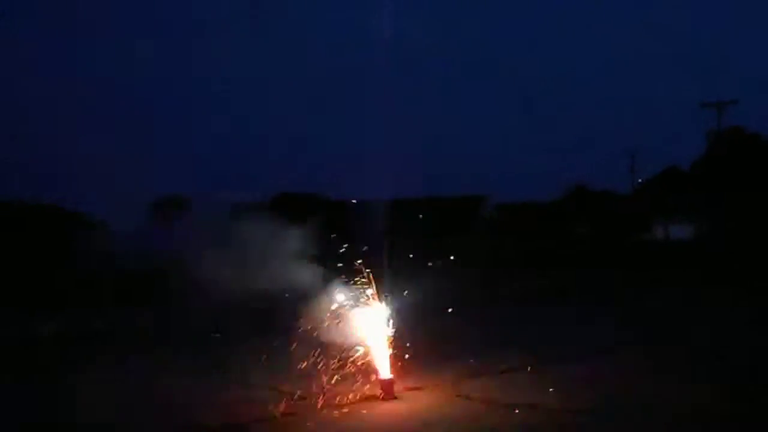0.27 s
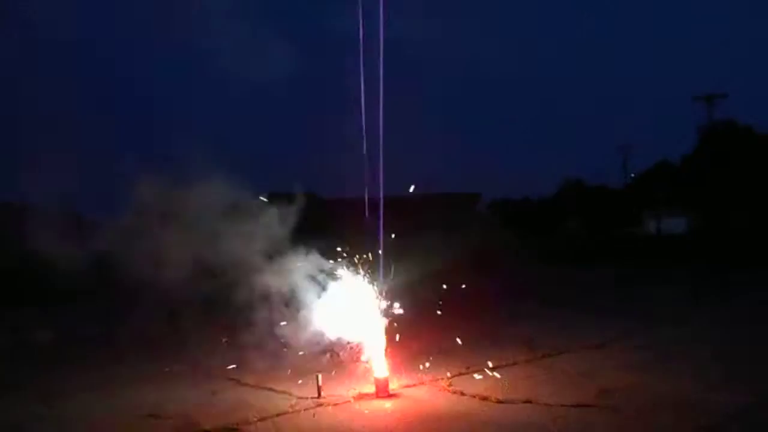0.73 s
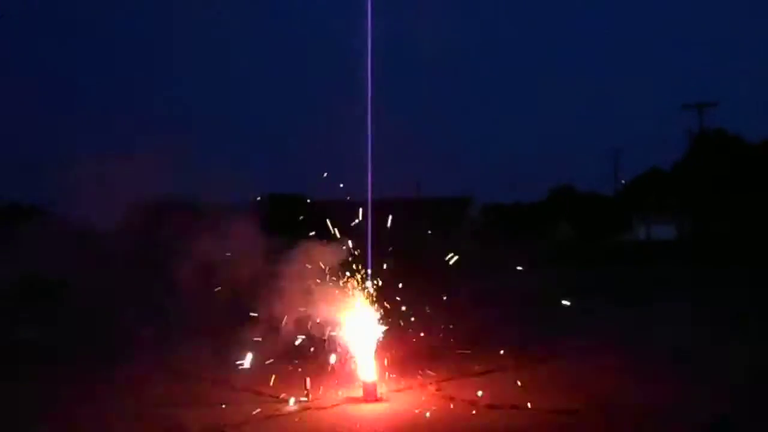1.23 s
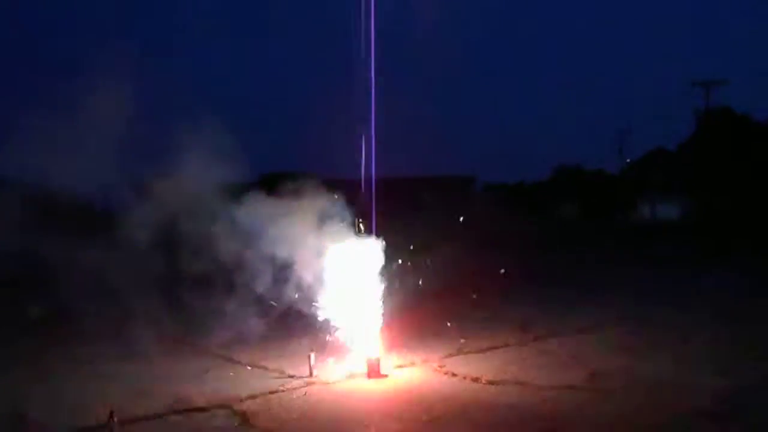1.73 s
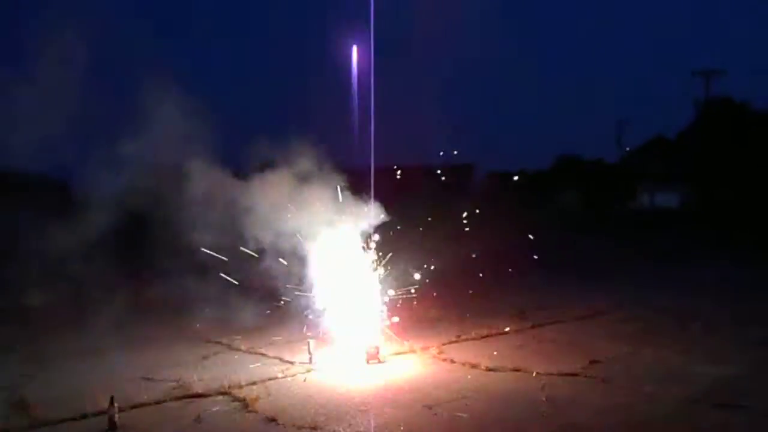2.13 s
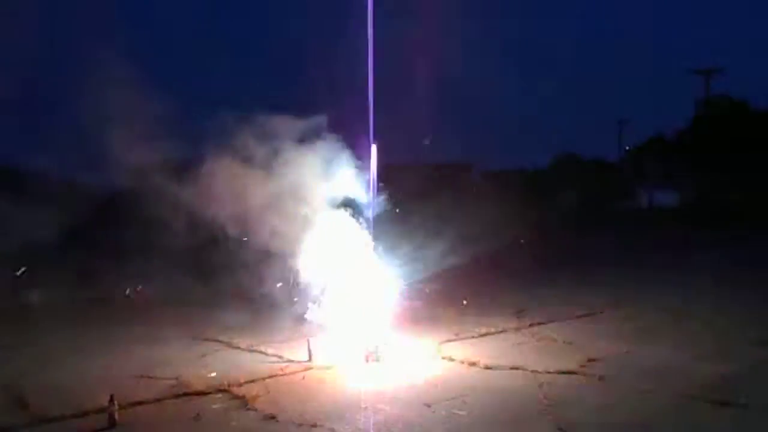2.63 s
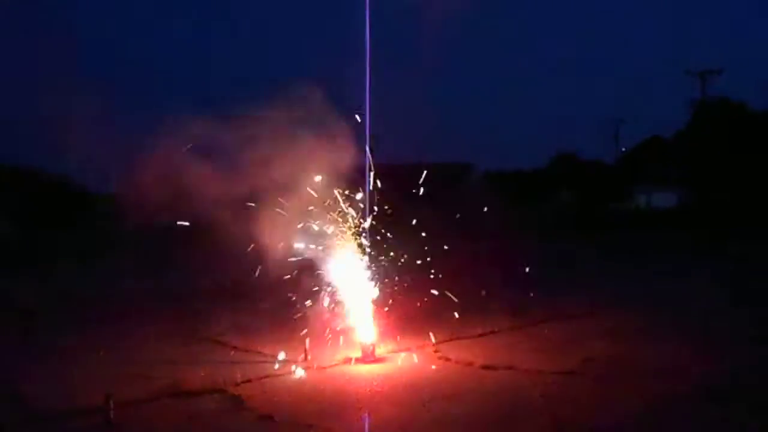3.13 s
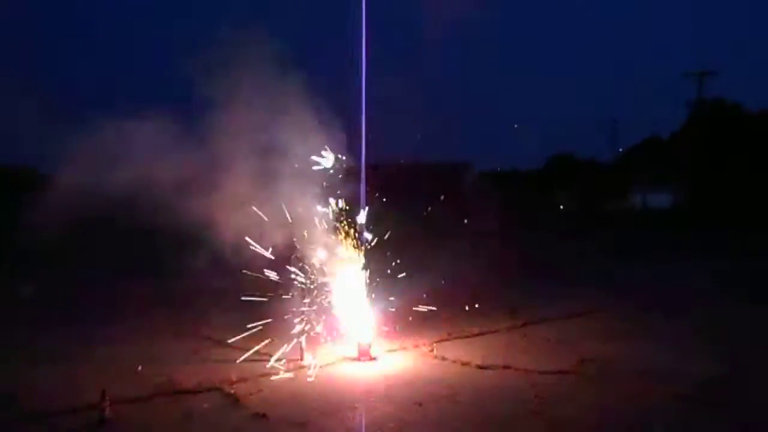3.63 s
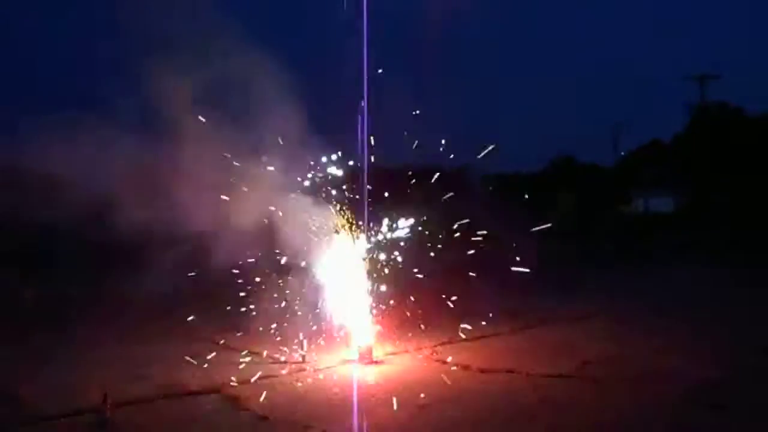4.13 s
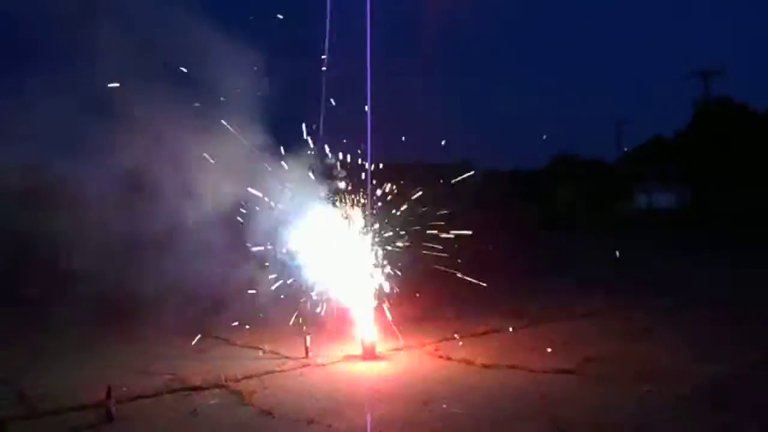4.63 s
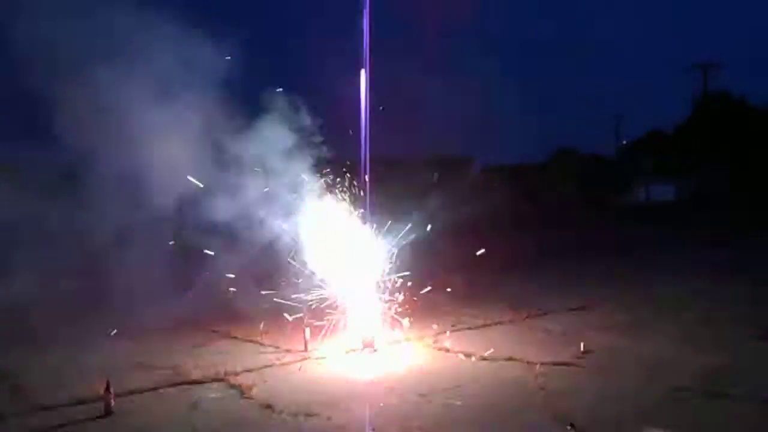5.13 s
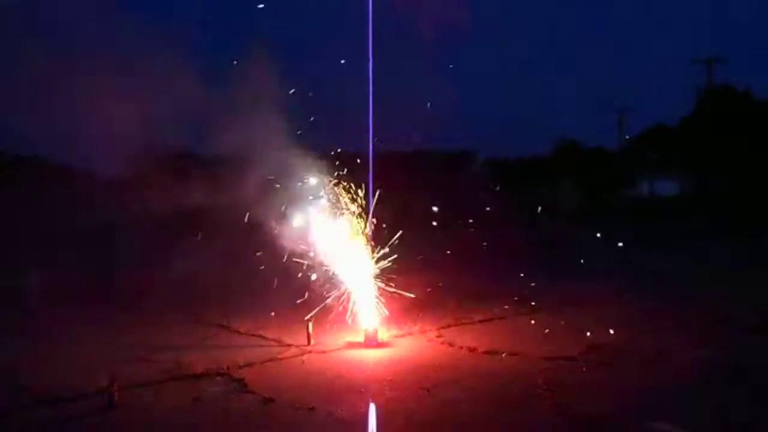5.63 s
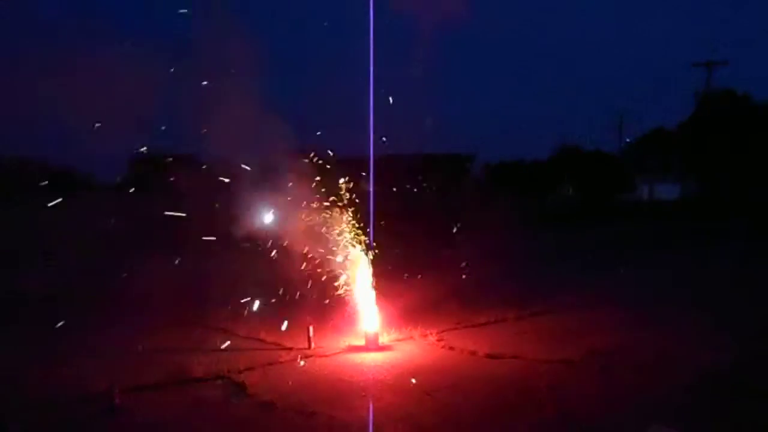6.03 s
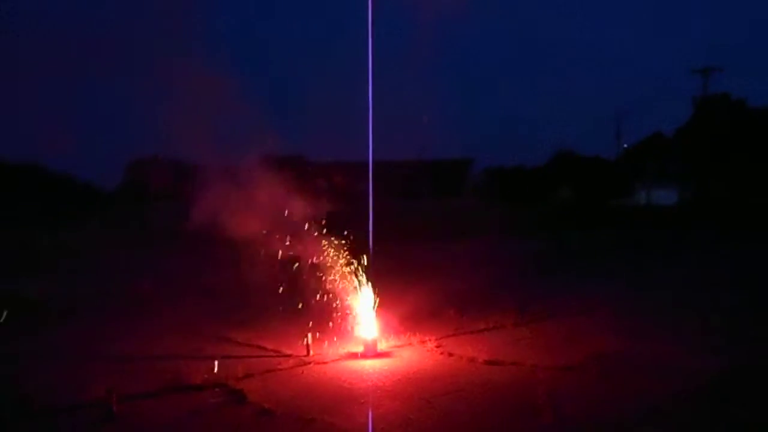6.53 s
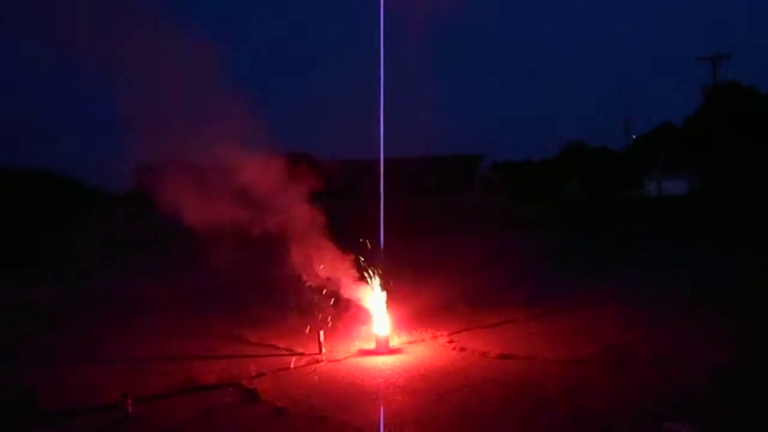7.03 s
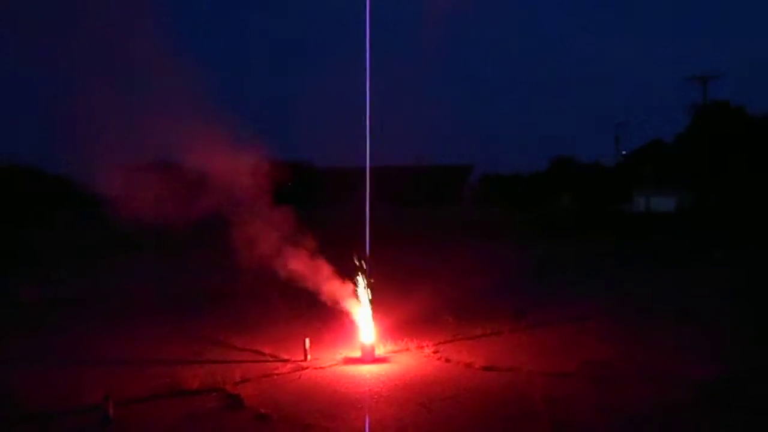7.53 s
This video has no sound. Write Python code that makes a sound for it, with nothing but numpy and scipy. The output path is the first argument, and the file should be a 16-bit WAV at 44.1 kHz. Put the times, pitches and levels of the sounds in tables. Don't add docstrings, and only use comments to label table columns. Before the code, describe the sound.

A firework fountain burns in an open paved area, heard fairly close on a small camera microphone. Dry pops and heavy cracks arrive in uneven clusters over faint hissing, fizzing sparks and gusty rumble, with a very distant engine hum early on. The hiss rises in pauses between bursts. Late on, the bursts end, the tube gives several hollow pops, and bright rushing gas takes over until the cut.

```python
import sys
import numpy as np
from scipy import signal
from scipy.fft import rfft, irfft, next_fast_len
from scipy.io import wavfile
from scipy.ndimage import uniform_filter1d, map_coordinates

SR = 44100
rng = np.random.default_rng(int(sys.argv[2]) if len(sys.argv) > 2 else 0)


def transcribe(u):
    v = np.clip(np.atleast_2d(u).T, -1, 1)
    q = np.round(v * 32767).astype(np.int16)
    wavfile.write(sys.argv[1], SR, q)


def gain_from_db(level_db):
    decades = np.asarray(level_db, float) / 20
    return 10 ** decades


N = 342657

# (time [s], level [dB])
ENGINE_HUM = [
    (0.0, -56),
    (1.2, -37),
    (1.6, -44),
    (2.4, -46),
    (3.3, -62),
    (4.0, -54),
    (7.77, -64),
]
# (time [s], level [dB])
GUSTS = [(0.0, -29.5), (0.45, -28), (0.7, -28.5), (0.95, -30.5), (1.2, -31.5), (1.5, -31), (1.8, -39.5),
         (2.5, -32.5), (2.9, -35), (3.6, -28), (4.2, -34.5), (4.5, -33), (4.8, -42), (5.1, -34),
         (5.7, -41.5), (6.6, -41.5), (7.05, -40), (7.77, -38)]
# (frequency [Hz], level [dB per Hz])
WIND_COLOUR = [(10, -30), (25, 3), (50, 0.5), (92, -1.5), (200, -16), (450, -20), (1000, -94),
               (22000, -120)]
ROAR_COLOUR = [(60, -20), (140, 5), (240, -3), (400, 1), (700, -0.5), (1300, -8.5), (2200, -47),
               (22000, -80)]
JET_COLOUR = [(600, -21), (1500, 3.5), (3000, 0.5), (6300, -9), (9400, -19.5), (12000, -28), (22000, -2)]
SPARK_COLOUR = [(700, -36), (1500, 4), (2500, 10), (5000, -2), (8000, -6.5), (12000, -19), (22000, -31)]
# (time [s], nozzle effort [dB], spark shower [dB])
BURN = [(0.0, 0.4, -56.5), (1.5, -1.5, -54.5), (3.0, -0.5, -51), (4.5, 1.1, -49), (5.6, 1.3, -48),
        (6.2, 1, -47.5), (6.5, 3, -57), (6.75, 14, -52), (6.95, 14, -46.5), (7.3, 18.5, -49.5),
        (7.77, 19, -41.5)]
# (time [s], peak [dB], mouth resonance [Hz], width [Hz])
COUGHS = [
    (6.4596, -15, 1260, 305),
    (6.5683, -22, 520, 299),
    (6.7811, -16, 900, 298),
    (6.889, -18.5, 810, 400),
    (6.9377, -17, 1260, 450),
    (7.069, -33, 445, 300),
]
# (delay [ms], spread [ms], level [dB], strongest frequency [Hz], width [Hz], flatness)
ECHOES = [
    (3.056, 0.15, -13.5, 1000, 2700, 0.4),
    (4.05, 0.85, -19, 440, 3800, 0.065),
    (8.2, 0.45, -43.5, 7500, 24000, .2),
    (14.9, 0.86, -25.5, 550, 3300, 0.23),
    (21.63, 0.18, -33.5, 1500, 7000, 4.7),
    (34.6, 0.099, -29, 1430, 980, 2.6),
]
# (time [s], peak [dB], ground bounce delay [ms], blast length [ms])
LOW_STARS = [(0.1291, 1, 0.31, 0.054), (0.1444, 4.5, 0.28, 0.18), (0.2059, 6, 0.33, 0.026),
             (0.2413, 1.2, 0.44, 0.081), (0.4115, -7, 0.31, 0.1), (0.4425, -8.5, 0.31, 0.14),
             (0.8271, -0.5, 0.31, 0.08), (1.161, 16, 0.53, 0.061), (1.3321, -4.5, 0.31, 0.16),
             (1.3614, 12, 0.44, 0.062), (1.7555, 17.5, 0.62, 0.049), (2.1917, -6.5, 0.32, 0.16),
             (2.2364, -1.5, 0.38, 0.1), (2.854, 20.5, 0.38, 0.048), (2.906, 4.5, 0.43, 0.044),
             (2.9726, -5.5, 0.32, 0.094), (3.0451, 2.5, 0.66, 0.062), (3.4163, -8, 0.66, 0.12),
             (4.194, -4.5, 0.47, 0.11), (5.2375, 10, 0.61, 0.062), (5.30876, -5, 0.47, 0.095),
             (5.8701, -11, 0.41, 0.2)]
# (time [s], peak [dB], ground bounce delay [ms], blast length [ms])
HIGH_STARS = [(0.8085, 11.5, 0.79, 0.074), (2.34621, 5.5, 0.75, 0.095), (2.3962, -0.7, 0.88, 0.2),
              (2.416, -1, 0.86, 0.16), (2.6032, -10, 1.01, 0.2), (3.28682, 0, 0.99, 0.086),
              (3.4436, -6, 0.85, 0.082), (3.446, -4, 1.19, 0.13), (3.8027, 9, 0.87, 0.09),
              (3.9356, 6, 0.81, 0.067), (3.97893, 3.5, 1.01, 0.08), (4.0688, 5.5, 1.02, 0.077),
              (4.2046, -2, 1.18, 0.087), (4.2447, -6, 0.89, 0.14), (4.5106, 5.5, 0.95, 0.058),
              (4.6694, -4.5, 1.15, 0.12), (4.7167, -3, 0.93, 0.12), (4.7765, -6.5, 1.57, 0.12),
              (4.945, -8, 0.77, 0.08), (5.32522, -2.5, 0.79, 0.11), (5.3513, 0.3, 1.19, 0.094),
              (5.4894, -1, 0.95, 0.092), (5.4926, 6.5, 1.25, 0.058), (5.831, -9, 0.83, 0.11),
              (5.8809, -5.5, 1.2, 0.14), (5.9653, -2.5, 1.64, 0.083)]
# (time [s], peak [dB], ground bounce delay [ms], blast length [ms], bounce [dB])
STRAY_STARS = [(1.26, 15, 0.46, 0.071, -14), (2.0659, 22, 0.61, 0.08, -21), (2.1388, 11, 0.83, 0.12, 0.5),
               (2.8569, 6.5, 0.73, 0.12, -0.5), (2.869, -7, 0.56, 0.12, 1), (2.8921, 11, 0.73, 0.12, -6),
               (3.17656, -11, 0.33, 0.088, -10), (3.2175, 1, 1.06, 0.087, -8.5),
               (3.2409, -9, 0.43, 0.046, -8), (4.2341, -5, 1.23, 0.14, -7),
               (4.6121, 10.5, 0.37, 0.08, -16.5), (4.6141, 0.5, 0.22, 0.18, -5),
               (4.95847, -4, 1.22, 0.11, -3), (5.6684, 6.5, 0.4, 0.078, -18),
               (5.8722, -2.5, 0.35, 0.097, -24), (6.0867, -3, 1, 0.071, -5),
               (6.33058, -3.5, 2.44, 0.75, -4.5)]
# (time [s], peak [dB], ground bounce delay [ms], blast length [ms], extra slow body [dB])
SMALL_STARS = [(0.596, -30, 0.34, 0.35, -8), (0.634, -25.5, 0.3, 0.15, 21.5),
               (0.69302, -22, 0.29, 0.097, 27.5), (0.76295, -21, 0.47, 0.086, -6),
               (1.0424, -24, 0.29, 0.2, 4), (1.2446, -16.5, 0.2, 0.23, 2), (1.8399, -16, 0.25, 0.17, 9),
               (2.4803, -24.5, 0.27, 0.18, 4), (2.5003, -26.5, 0.16, 0.2, 0),
               (2.9378, -15, 0.17, 0.21, -14), (3.0212, -20, 0.32, 0.13, 11), (3.1293, -30, 0.25, 0.13, 12),
               (3.735, -33, 0.23, 0.09, -7), (3.887, -22, 0.16, 0.18, -7), (3.89, -22.5, 0.23, 0.19, -8),
               (4.1522, -26.5, 0.8, 0.2, 13), (4.8902, -18, 0.33, 0.13, 11.5),
               (5.0435, -32.5, 0.23, 0.21, 8), (5.4367, -26, 0.67, 0.33, 3), (6.05, -28.5, 0.24, 0.23, -4)]
# (time [s], peak [dB], ground bounce delay [ms])
FAR_STARS = [(0.229, -16.5, 0.83), (0.32556, -26.5, 0.74), (0.56, -31, 0.76), (0.8934, -17, 1.24),
             (0.9316, -28, 1.13), (1.4447, -20.5, 0.26), (1.4843, -29, 1.3), (2.2235, -18, 0.72),
             (2.32, -25, 1.2), (2.6888, -42, 1.1), (3.37129, -26, 0.77), (3.531, -28, 0.83),
             (3.5688, -36, 0.31), (4.0194, -23, 0.73), (4.2896, -29, 0.89), (4.3184, -29, 0.81),
             (4.6983, -17, 0.5), (4.86192, -36, 0.58), (5.5763, -23.5, 0.98), (5.5798, -25, 0.75),
             (5.748, -22.5, 0.42), (5.95495, -23, 0.78), (6.1708, -35, 1.43)]
# (time it lets go [s], gain then [dB], time a loud burst stops it [s], gain then [dB])
RELEASES = [(0.0, -4, 0.12, 4), (0.33, -6, 0.41, -4), (0.58, -5.5, 0.71, 3), (0.97, -2, 1.16, 6.5),
            (1.52, -6, 1.68, 5), (1.92, 5.5, 2.09, 6), (2.56, -7.5, 2.84, 3.5), (3.56, -16.5, 3.83, 3.5),
            (4.38, -14, 4.51, 1), (5.1, -12, 5.25, 5), (5.5, -8.5, 5.6, -5), (6.23, -16, 6.34, 3)]
# (frequency [Hz], level [dB])
MIC_RESPONSE = [(20, 0), (3000, 0), (8000, 5), (10000, 9), (10900, -3), (12100, -8), (12900, -62),
                (22000, -87)]

SPAN, LEAD = 4096, 64
NOZZLE_BOUNCE_S = .00031


def unit(x):
    return x / np.sqrt(np.mean(x ** 2) + 1e-20)


def curves(rows):
    s, *columns = np.transpose(rows)
    return [np.interp(np.arange(N) / SR, s, column) for column in columns]


def along(points, hz):
    f, v = np.transpose(points)
    return np.interp(np.log(hz + 1), np.log(f + 1), v)


def wobble(rate):
    knots = rng.standard_normal(int(N * rate / SR) + 4)
    return map_coordinates(knots, [np.arange(N) * rate / SR])


def filtered(x, response):
    m = next_fast_len(N + SPAN)
    return irfft(rfft(x, m) * response(np.fft.rfftfreq(m, 1 / SR)), m)[..., :N]


def rush(colour, patchy_db):
    z = signal.stft(rng.standard_normal(N + 512), nperseg=512)[2]
    patches = uniform_filter1d(rng.standard_normal(z.shape), size=6, axis=0)
    patches = uniform_filter1d(patches, size=10, axis=1)
    noise = signal.istft(z * gain_from_db(patchy_db * unit(patches)), nperseg=512)[1][:N]
    return unit(filtered(noise, lambda hz: gain_from_db(along(colour, hz))))


def resonance(hz, ring_hz, width_hz):
    return ring_hz ** 2 / (ring_hz ** 2 - hz ** 2 + 1j * hz * width_hz)


def blast(jw, tau):
    return SR * tau * jw * tau / (1 + jw * tau) ** 2


def engine():
    tone = filtered(rng.standard_normal(N), lambda hz: resonance(hz, ring_hz=92, width_hz=8) ** 2)
    return gain_from_db(curves(ENGINE_HUM)[0]) * unit(tone)


def wind():
    wind_db, = curves(GUSTS)
    gusty = gain_from_db(2.6 * wobble(6)) * rush(WIND_COLOUR, patchy_db=0.46)
    return gain_from_db(wind_db - 3.0) * unit(gusty)


def flame_roar(effort_db, flicker):
    roar_db = -46.5 + 0.56 * effort_db
    unsteady_db = .5 * flicker + .7 * wobble(40)
    return gain_from_db(roar_db - .3 + unsteady_db) * rush(ROAR_COLOUR, patchy_db=.7)


def nozzle_jet():
    grains = rng.exponential(size=N // 16 + 1).repeat(16)[:N]
    spit = 1 + .12 * grains ** 1.5
    jet = unit(spit * rush(JET_COLOUR, patchy_db=1.5))
    return filtered(jet, lambda hz: (1 + 0.68 * np.exp(-2j * np.pi * hz * NOZZLE_BOUNCE_S)) / 1.535)


def spark_shower(sparks_db):
    return gain_from_db(sparks_db + 1.6 * wobble(40)) * rush(SPARK_COLOUR, patchy_db=2.5)


def fountain():
    effort_db, shower_db = curves(BURN)
    hiss_db = -50 + effort_db
    sparks_db = shower_db - hiss_db + 1.5 * wobble(5)
    flicker = wobble(4.9)
    hiss = gain_from_db(hiss_db + 1.32 + 0.09 * flicker) * (nozzle_jet() + spark_shower(sparks_db))
    return hiss + flame_roar(effort_db, flicker)


def ticks():
    per_s, level_db, spread_db, end_s = 57, -48, 4.5, 4.7
    chance, size = rng.random(N), rng.exponential(size=N)
    happens = (chance < per_s / SR) * (np.arange(N) < end_s * SR)
    snaps = happens * gain_from_db(level_db + spread_db * size)

    def snap_and_bounce(hz):
        jw = 2j * np.pi * hz
        return blast(jw, 0.00006) * (1 + np.exp(-jw * NOZZLE_BOUNCE_S))

    return -filtered(snaps, snap_and_bounce)


def gain_control():
    return curves(np.reshape(RELEASES, (-1, 2)))[0]


def coughs():
    out, hz = np.zeros(N + SPAN), np.fft.rfftfreq(SPAN, 1 / SR)
    tube = 1.7 * resonance(hz, ring_hz=400, width_hz=160)
    for s, db, mouth_hz, width_hz in COUGHS:
        ringing = resonance(hz, mouth_hz, width_hz) + tube + 0.06
        puff = irfft(blast(2j * np.pi * hz, 0.00019) * ringing, SPAN)
        out[round(s * SR):][:SPAN] -= gain_from_db(db) * puff / np.abs(puff).max()
    return out[:N]


def stars():
    low = [(*row, 2, 0) for row in LOW_STARS]
    high = [(*row, 2, 0) for row in HIGH_STARS]
    stray = [(*row, 0) for row in STRAY_STARS]
    small = [(*row[:4], 1, row[4]) for row in SMALL_STARS]
    far = [(*row, 0.22, -13, 0) for row in FAR_STARS]
    return low + high + stray + small + far


def surroundings(scatter_db, t60, far_db, far_t60, top_hz):
    t, hz = np.arange(SPAN) / SR, np.fft.rfftfreq(SPAN, 1 / SR)
    grit = rng.standard_normal((len(stars()), SPAN))
    litter, trees = gain_from_db(scatter_db - 60 * t / t60), gain_from_db(far_db - 60 * t / far_t60)
    tail = (litter + trees) * (t > .0002)
    total = rfft(tail * grit) / (1 + 1j * hz / top_hz)
    for ms, spread, db, echo_hz, width_hz, flat in ECHOES:
        shift, size = rng.standard_normal((2, len(grit), 1))
        cluster = np.exp(-.5 * ((t * 1000 - ms - 0.2 * shift) / spread) ** 2)
        cluster = cluster / np.linalg.norm(cluster, axis=1, keepdims=True)
        face = (flat + grit) * cluster / np.hypot(flat, 1)
        colour = np.abs(hz * width_hz / (echo_hz ** 2 - hz ** 2 + 1j * hz * width_hz)) ** 2
        total += gain_from_db(db + 2 * size) * rfft(face) * colour
    return total


def pops():
    s, db, bounce_ms, length_ms, bounce_db, extra_db = np.transpose(stars())[:, :, None]
    body_db = -23.5 + extra_db + 0.05 * db + 4 * np.log2(length_ms * 10)
    start = (s * SR).astype(int) - LEAD
    jw = 2j * np.pi * np.fft.rfftfreq(SPAN, 1 / SR)
    rise = 0.00017 * np.clip(length_ms - .1, 0, .35)
    crack = -blast(jw, 0.00062 * length_ms) / (1 + jw * rise) ** 2
    body = gain_from_db(body_db) * blast(jw, 0.00059) / (1 + jw * 0.00018) ** 2
    paths = 1 + gain_from_db(bounce_db) * np.exp(-jw * bounce_ms / 1000)
    around = surroundings(scatter_db=-37, t60=0.023, far_db=-54, far_t60=0.15, top_hz=9800)
    sound = (crack + body + (crack - 0.16 * body) * around) * paths
    on_time = np.exp(-jw * (s - start / SR - .00004))
    waves = gain_from_db(db + 6) * irfft(sound * on_time, SPAN)
    places = start + np.arange(SPAN)
    return np.bincount(places.ravel(), waves.ravel(), N + SPAN)[:N]


def scene():
    background = gain_from_db(gain_control()) * (engine() + wind() + fountain() + ticks())
    body_rumble = gain_from_db(-53) * rush(WIND_COLOUR, patchy_db=3.5)
    return (body_rumble + background + coughs() + pops())[None]


def overload(x, top, hard):
    return x / (1 + np.abs(x / top) ** hard) ** (1 / hard)


def band_limit(x):
    return signal.sosfilt(signal.butter(12, 16830, fs=SR, output="sos"), x)


def record(dry):
    x = filtered(dry, lambda hz: resonance(hz, ring_hz=8490, width_hz=7000))
    x = overload(x, top=0.45, hard=6)
    x = filtered(x, lambda hz: gain_from_db(along(MIC_RESPONSE, hz)))
    x = overload(x, top=.7, hard=30)
    x = filtered(x, lambda hz: 1 / (1 + (hz / 16200) ** 60))
    return band_limit(x)


dry = scene()
out = record(dry)
transcribe(out)
```